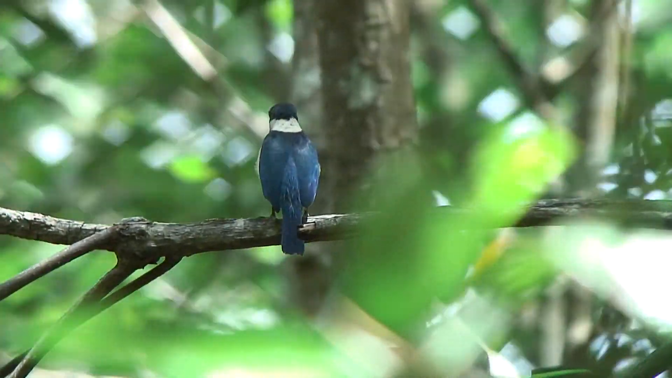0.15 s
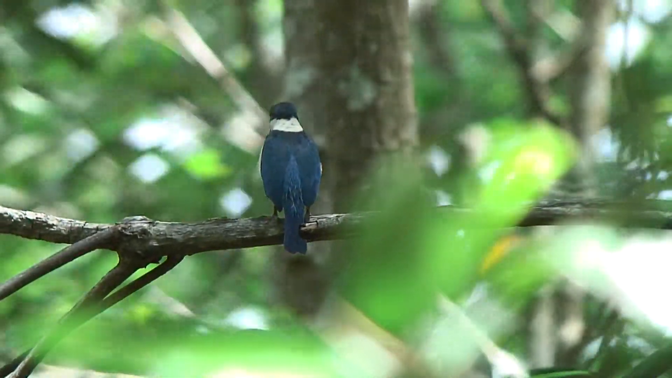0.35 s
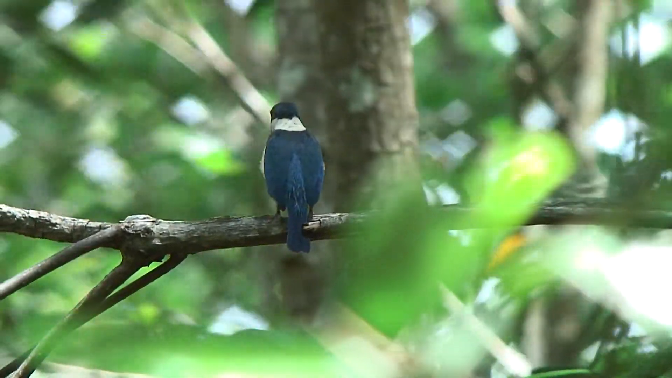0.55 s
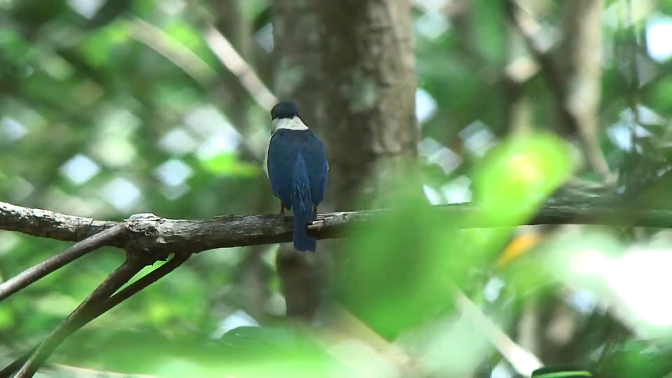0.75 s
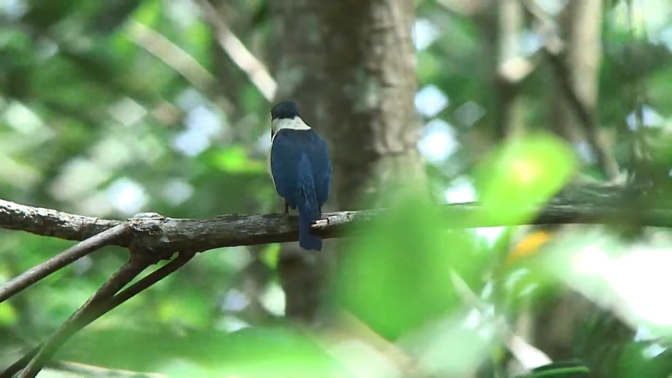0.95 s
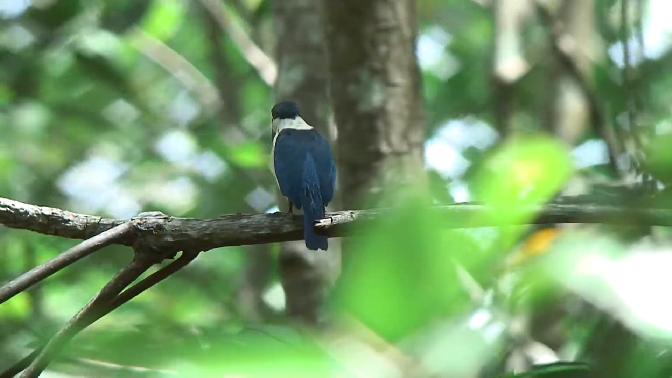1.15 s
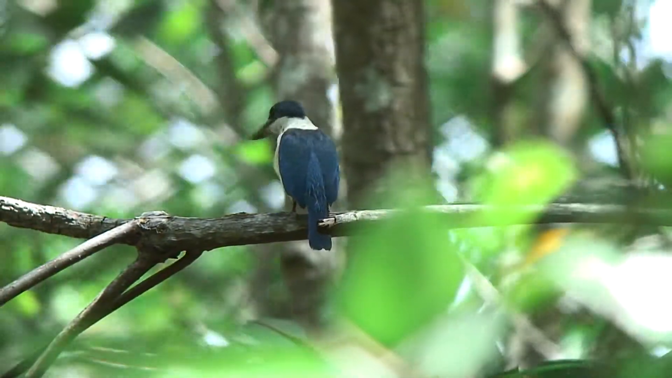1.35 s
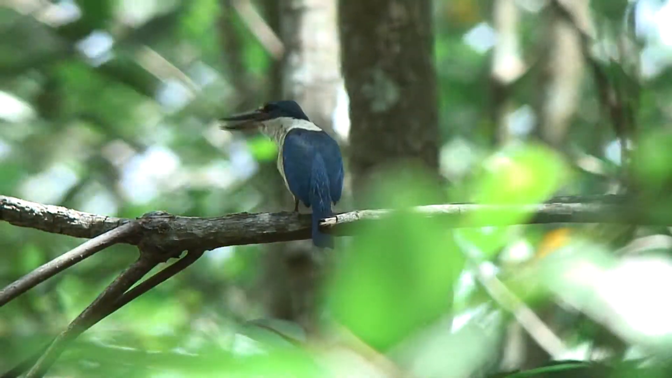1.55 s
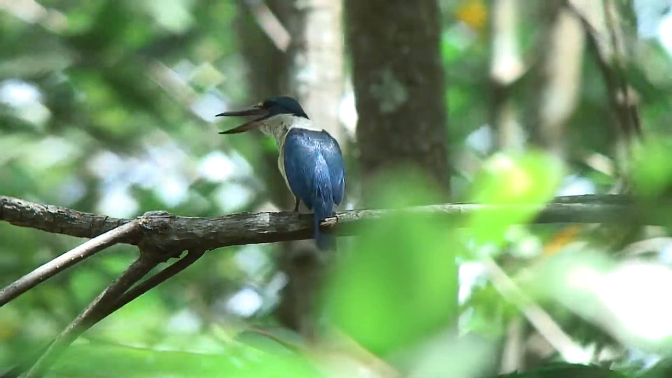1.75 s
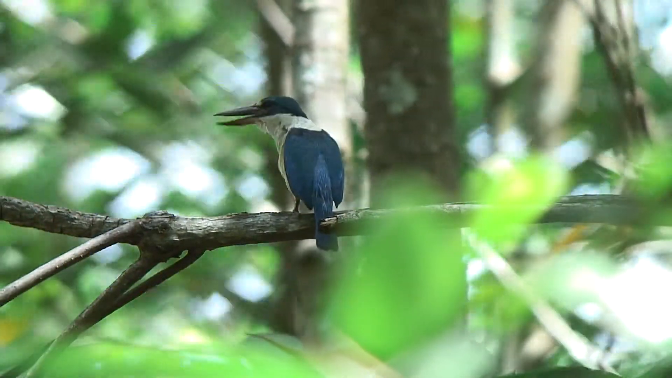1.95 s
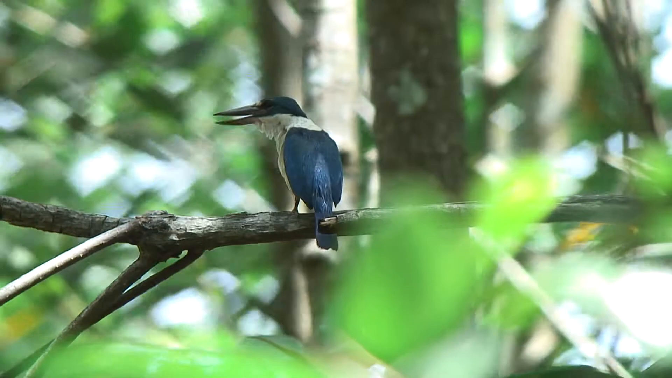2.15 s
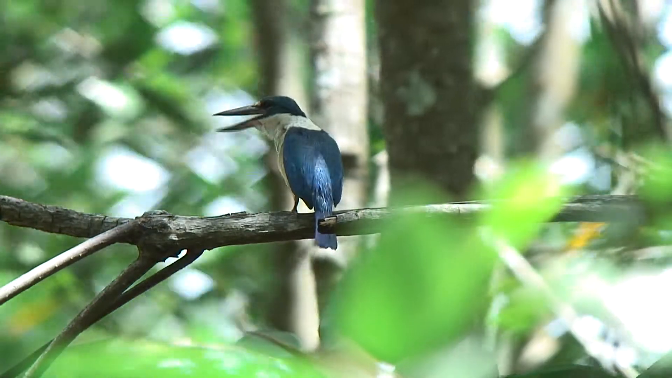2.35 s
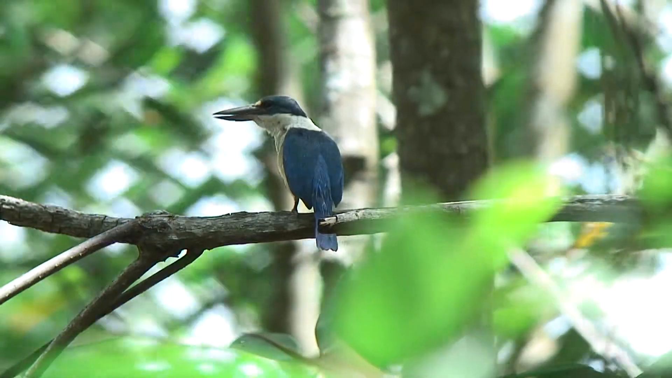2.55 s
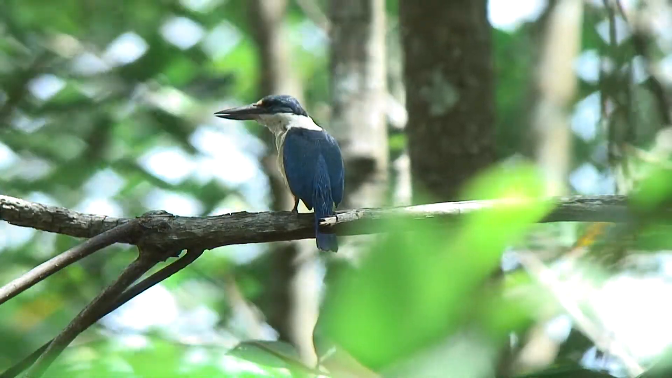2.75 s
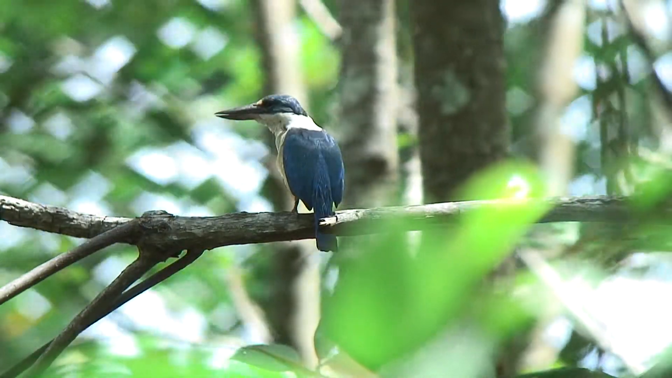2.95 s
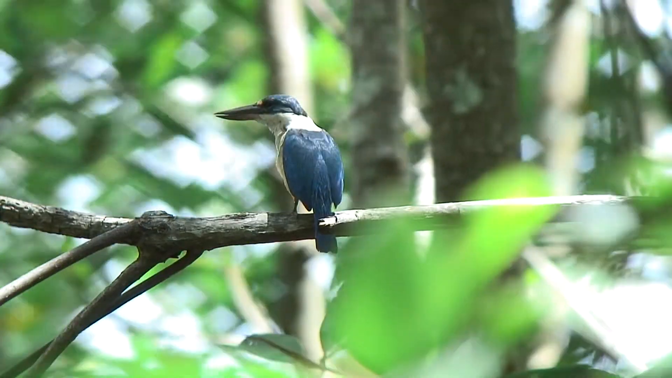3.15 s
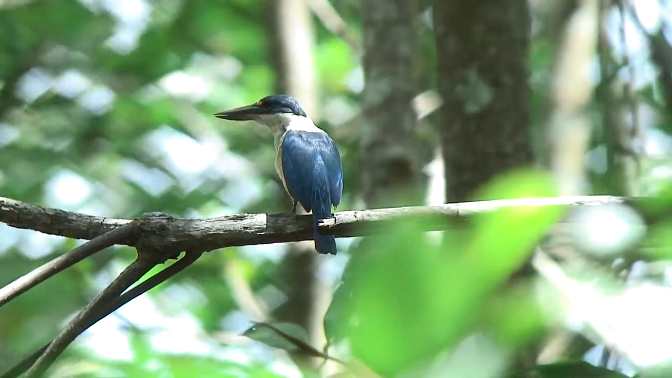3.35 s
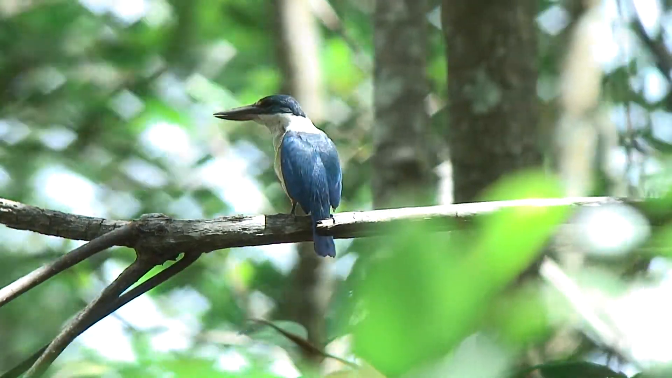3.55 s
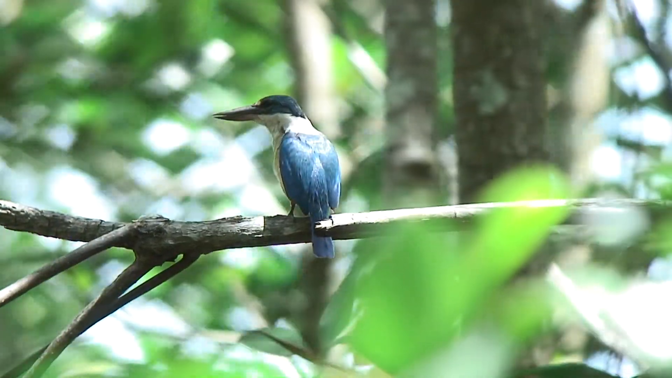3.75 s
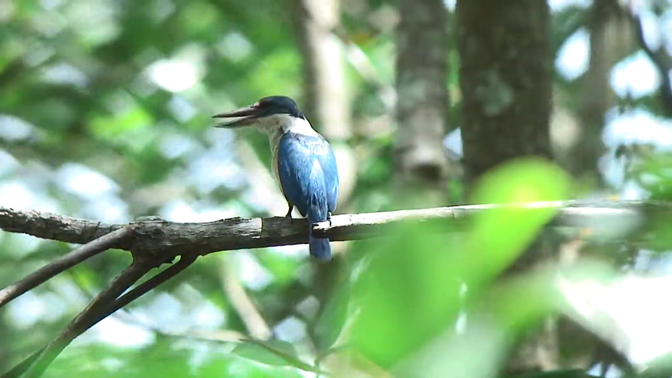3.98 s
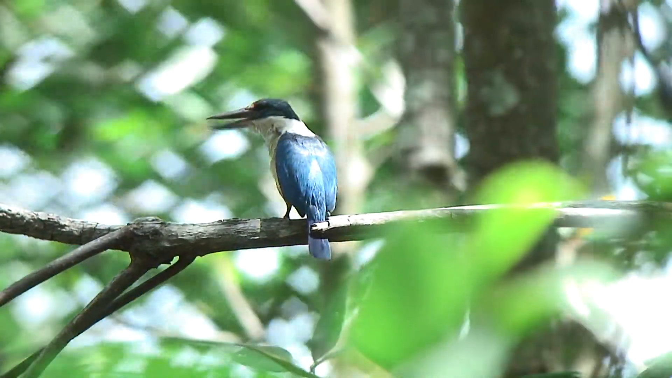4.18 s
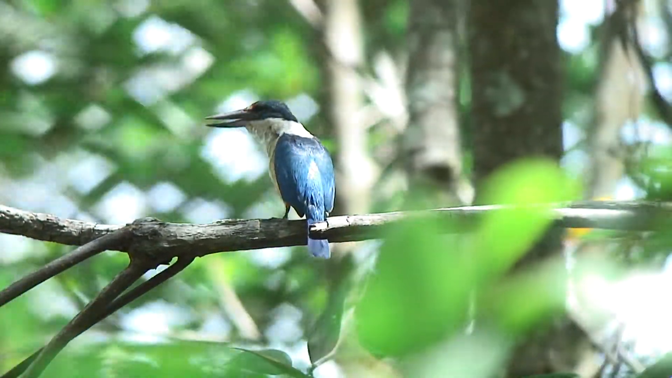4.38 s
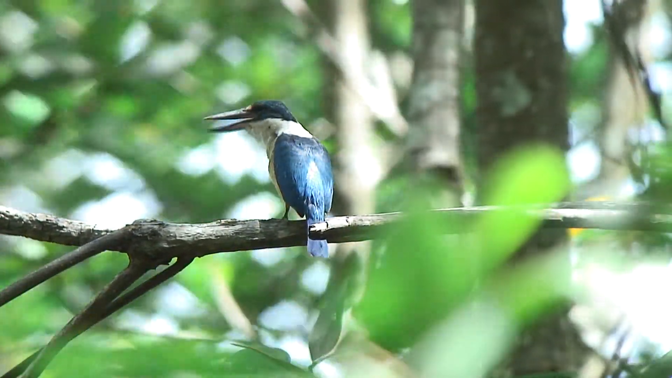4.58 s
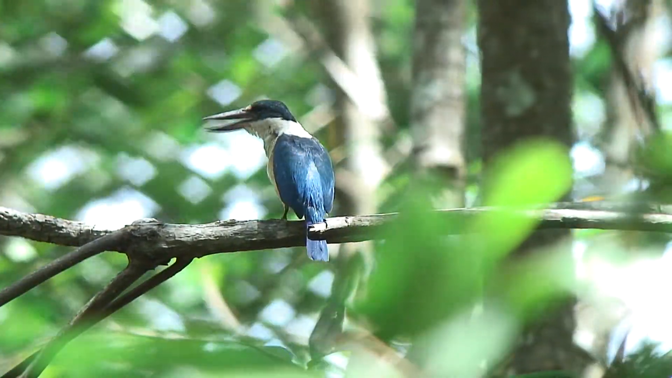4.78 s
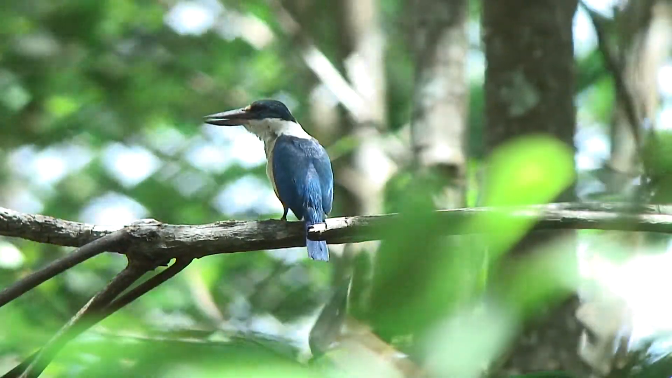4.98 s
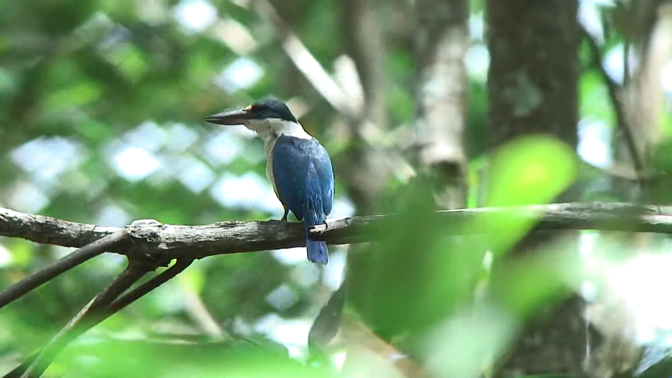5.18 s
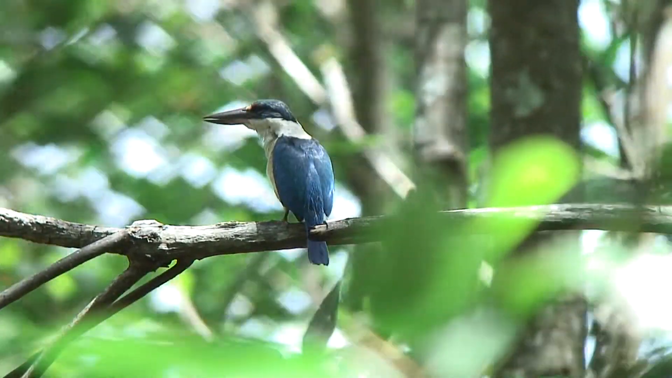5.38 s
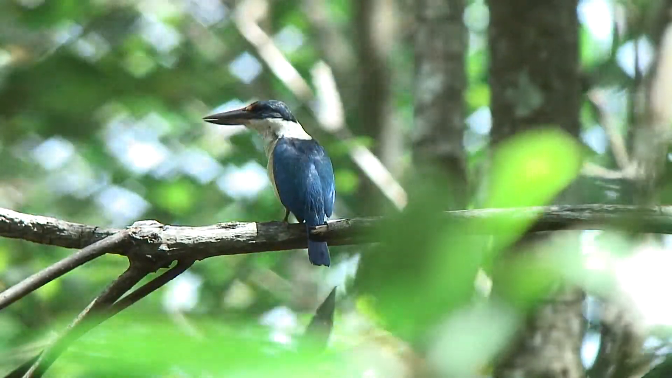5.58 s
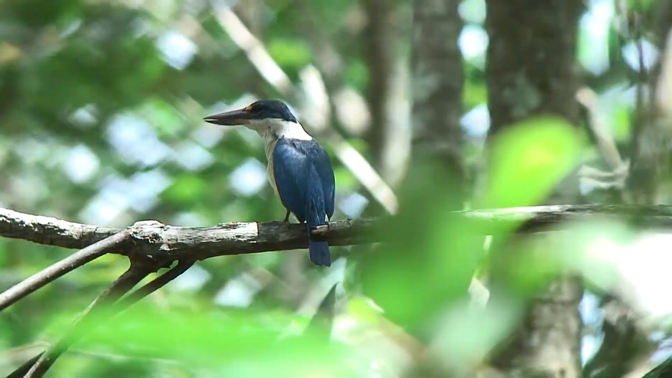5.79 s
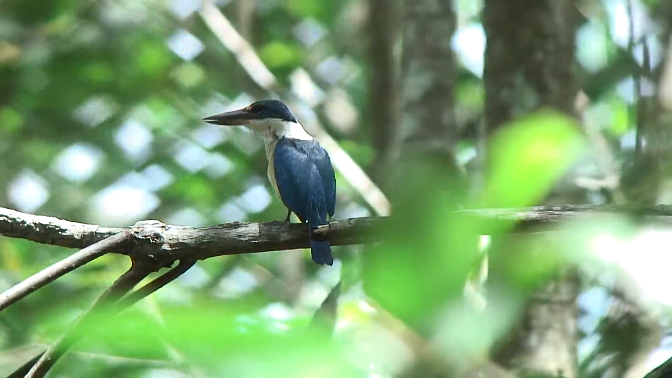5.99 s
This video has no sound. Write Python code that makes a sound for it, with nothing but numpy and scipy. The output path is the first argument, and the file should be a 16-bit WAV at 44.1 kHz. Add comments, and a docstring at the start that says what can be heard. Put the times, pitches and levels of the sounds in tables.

```python
"""Forest hiss and thin insect buzzes run from the start: noise shaped in pitch and level.
At 1.6 s a kingfisher calls a soft opening note and three harsh cries, and at 4.1 s it calls such a phrase again.
Each note is a stack of falling sine tones; cries also split into half and quarter tones and end hoarse.
Trunks and leaves scatter every call into a long tail of decaying noise.
Near the end come one thin high tick and one faint far bird, both made of narrowed noise."""
import sys
import numpy as np
from scipy import signal
from scipy.fft import rfft, irfft
from scipy.io import wavfile

SR = 44100
rng = np.random.default_rng(int(sys.argv[2]) if len(sys.argv) > 2 else 0)


def transcribe(signal):
    """Save signal, clipped to [-1, 1], as a 16-bit WAV file at the path in sys.argv[1]."""
    frames = np.atleast_2d(signal).T
    limited = np.clip(frames, -1, 1)
    pcm = np.round(limited * 32767).astype(np.int16)
    wavfile.write(sys.argv[1], SR, pcm)


N = 265746   # length of the scene in samples
TIME = np.arange(N) / SR   # seconds

CLEAR, HOARSE = 0.034, 0.56   # roughness of a clear and of a hoarse voice, 0-1


def kingfisher():
    """Both phrases as they leave the bill: the voice sings an opening note and three cries each time."""
    # soft opening notes: start_s, length_s, top_pitch_hz, level_db, swells_after_s
    opening_notes = [(1.587, .099, 1633, -26, 0.046), (4.082, .118, 1573, -25.5, 0.038)]
    # harsh cries: start_s, length_s, top_pitch_hz, level_db, splits_after_s, breaks_after_s,
    # share_of_fall_at_break (0-1), likeness_to_closing_cry (0-1)
    cries = [(1.846, 0.11, 1721, -23.5, 0.034, 0.065, .26, 0.3),
             (2.136, 0.1, 1711, -22, 0.025, .057, 0.241, 0.2),
             (2.426, 0.098, 1670, -24, 0.03, 0.057, 0.13, 0.95),
             (4.345, 0.1, 1734, -22.5, 0.021, 0.069, 0.25, 0),
             (4.627, .104, 1720, -22.5, 0.016, .066, 0.231, 0),
             (4.918, 0.092, 1681, -23.5, 0.026, 0.05, 0.13, 0.97)]
    # harmonics of the voice: multiple_of_pitch, opening_note_db, cry_db
    harmonics = [(1, -8, -5.5), (2, -1.5, -1), (3, -7, -9), (4, -10, -13), (5, -35.5, -27.5), (6, -22, -25),
                 (7, -19, -23.5), (8, -17.5, -19), (9, -24.5, -25.5)]
    # tones between the harmonics when the voice splits: quarters_of_pitch, cry_db, closing_cry_db
    side_tones = [(6, -14, -15.5), (7, -19.5, -25.5), (9, -9, -15.5), (10, -9, -6.5), (11, -32, -21),
                  (13, -22.5, -21), (14, -14, -9.5), (15, -27, -27), (18, -25.5, -26), (22, -25.5, -30.5),
                  (26, -31.5, -34), (30, -30, -23.5)]
    multiples, opening_db, cry_db = np.transpose(harmonics)
    quarters, cry_side_db, closing_side_db = np.transpose(side_tones)
    out = np.zeros(N)

    for start, length, top_hz, db, swell_s in opening_notes:
        course = opening_course(length, swell_s)
        sound = note(course, zip(multiples, opening_db), zip(quarters, cry_side_db), top_hz)
        add(out, start, from_db(db) * sound)

    for start, length, top_hz, db, split_s, break_s, step, closing in cries:
        course = cry_course(length, split_s, break_s, step)
        side_db = cry_side_db + np.clip(closing, 0, 1) * (closing_side_db - cry_side_db)
        sound = note(course, zip(multiples, cry_db), zip(quarters, side_db), top_hz)
        add(out, start, from_db(db) * sound)
    return out


def note(course, harmonics, side_tones, top_hz, jitter=0.013, rasp_db=-22.5):
    """One arched note: the tones of the syrinx, a bird's voice box, sweep through the throat's resonance."""
    # throat and open bill: pitch_hz, gain_db
    throat = [(1200, -17.5), (1500, -13.5), (1700, -10.5), (2300, -1.5), (2700, -2.5), (3000, -0.5),
              (3450, 1.5), (3800, -9.5), (4900, -12.5), (5600, -21), (6500, -12), (7600, -22.5),
              (8850, -11.5), (9800, -23), (14000, -24)]
    # rasp of air in the throat: pitch_hz, density_db (dB per Hz)
    rasp = [(1200, -25.5), (2000, -28), (2900, -10.5), (3600, -7), (5000, -9.5), (7300, -9), (9000, -5.5),
            (11000, -20.5), (14000, -19.5), (16000, -31.5)]
    end_hz = 1242   # every note falls towards this pitch
    flutter_db, flutter_hz = 3.5, 161   # a hoarse voice flutters in level

    lift, effort, split, rough, twang_db = course
    size = len(lift)
    pitch = end_hz + lift * (top_hz - end_hz)
    pitch = pitch * (1 + jitter * rough * wander(450, size))
    phase = 2 * np.pi * np.cumsum(pitch) / SR

    def tone(multiple, db):
        """A sine at a multiple of the pitch, as loud as the throat lets it through."""
        gain = from_db(db + at_hz(throat, multiple * pitch)[0])
        return gain * np.sqrt(2) * np.sin(multiple * phase + rng.uniform(0, 2 * np.pi))

    # the second harmonic carries the note; twang changes the level of its neighbours and the fourth
    voice = sum(tone(round(k), db + twang_db * (round(k) in (1, 3, 4))) for k, db in harmonics)
    # the period doubles, then doubles again: tones appear between the harmonics
    voice += split * sum(tone(round(q) / 4, db) for q, db in side_tones)
    # air rasps once in every cycle
    voice += from_db(rasp_db) * rough * coloured(rasp, size) * (1 + np.cos(phase))

    flutter = from_db(flutter_db * rough * wander(flutter_hz, size))
    soft_ends = signal.windows.tukey(size, .04)
    voice *= effort * flutter * soft_ends
    # so small a bill radiates no lows
    return signal.sosfilt(signal.butter(4, 900, "high", fs=SR, output="sos"), voice)


def opening_course(length, swell_s):
    """Thin and soft at first, then the note swells; it frays most towards its end."""
    scoop_s, attack_s, swell_time_s, release_s = 0.01, 0.004, .0022, 0.0033
    soft_db, fade_db = -9.5, -4.5   # level before the swell; change over the whole fall
    base_twang_db = -4.5   # twang makes up for the softness before the swell
    split_db, fray_db = -32.5, 24   # side tones stay faint and rise only as the note falls

    t, scoop, fall = arch(length, scoop_s)
    softness_db = soft_db * (1 - switch(t - swell_s, swell_time_s))
    gate = (1 - np.exp(-t / attack_s)) * (1 - np.exp((t - length) / release_s))
    effort = gate * from_db(softness_db + fade_db * fall)
    split = from_db(split_db + fray_db * fall)
    rough = CLEAR + (HOARSE - CLEAR) * fall ** 2
    return 1 - scoop - fall, effort, split, rough, base_twang_db - softness_db


def cry_course(length, split_s, break_s, step):
    """A clear start and a split near the crest; then the voice breaks, steps down and ends hoarse."""
    scoop_s, attack_s = 0.00497, 0.0083
    split_time_s, break_time_s, hoarse_time_s = 0.00083, 0.0031, 0.0046   # how gradually each change comes
    split_db, flare_db, split_fade_db = 0.5, 5, -23   # side tones: at crest, extra at break, over the fall
    fade_db = -6   # change of level over the whole fall
    crest_twang_db, twang_fade_db = 1.27, -7.5   # twang before the break, and its change at the break

    t, scoop, fall = arch(length, scoop_s)
    broken = switch(t - break_s, break_time_s)
    flare = np.exp(-((t - break_s) / (2 * break_time_s)) ** 2 / 2)
    fall = step * broken + (1 - step) * fall
    effort = (1 - np.exp(-t / attack_s)) * from_db(fade_db * np.sqrt(np.abs(fall)))
    side_tone_db = split_db + flare_db * flare + split_fade_db * fall ** 2
    split = switch(t - split_s, split_time_s) * from_db(side_tone_db)
    rough = CLEAR + (HOARSE - CLEAR) * switch(t - break_s, hoarse_time_s)
    return 1 - scoop - fall, effort, split, rough, crest_twang_db + twang_fade_db * broken


def arch(length, scoop_s):
    """A note scoops up, crests, sags and finally drops: time, depth of the scoop, share of the fall done."""
    crest = .29   # share of the note after which its pitch falls
    scoop_depth = .66   # share of the arch by which the note starts low
    sag, sag_bend, drop_bend = 0.6, 1.4, 5.84   # share of the fall that sags slowly; bends (1 = straight)
    t = np.arange(int(length * SR)) / SR
    late = np.clip((t / length - crest) / (1 - crest), 0, 1)
    fall = sag * late ** sag_bend + (1 - sag) * late ** drop_bend
    return t, scoop_depth * np.exp(-t / scoop_s), fall


def forest(call, near_t60=0.52, near_db=-3.0, far_db=-3, build_s=0.0087, bill_hz=7000):
    """The straight path and a diffuse tail: near leaves and far trees scatter the call as decaying noise."""
    # scattering by the forest: pitch_hz, level_db, far_tail_t60_s (time to fade by 60 dB)
    scattering = [(1200, -3, 0.46), (1650, -10.5, 0.76), (2577, 5, 1.28), (3260, -0.5, 1.14),
                  (4800, -1, 1.24), (6700, 0, 1.3), (8900, 4, 0.85), (15000, 2, 0.35)]
    t = np.arange(int(1.3 * SR)) / SR
    edges = np.geomspace(1000, 16000, 13)   # Hz, limits of twelve bands
    tail = np.zeros(len(t))
    for low, high in zip(edges, edges[1:]):
        db, far_t60 = at_hz(scattering, np.sqrt(low * high))
        band = signal.butter(2, [low, high], "band", fs=SR, output="sos")
        for decay_s, part_db in ((near_t60, near_db), (far_t60, far_db)):
            shape = from_db(-60 * t / decay_s) * (1 - np.exp(-(t / build_s) ** 2))
            echoes = signal.sosfilt(band, rng.standard_normal(len(t)))
            tail += from_db(db + part_db) * echoes * shape / np.linalg.norm(shape)
    # the bill points aside, so the highest tones arrive mostly by way of the trees
    straight = signal.sosfilt(signal.butter(2, min(bill_hz, .45 * SR), fs=SR, output="sos"), call)
    return straight + signal.fftconvolve(call, tail)[:N]


def insects():
    """Two narrow buzzes, far off, and a third insect that whirrs in bouts around a purer note."""
    # insects that buzz on and on: start_s, end_s, pitch_hz, width_hz, level_db
    long_buzzes = [(-.3, 2.1, 6310, 127, -73), (.35, 3.7, 7490, 172, -75)]
    # an insect that sings in bouts: start_s, end_s, level_db
    bouts = [(1.8, 3.035, -76.5), (3.15, 3.822, -70.5), (3.999, 4.823, -70), (4.927, 5.668, -69),
             (5.97, 6.3, -68.5)]
    buzz_fade_s, bout_fade_s = .1, 0.026
    waver_db, waver_hz = 3.6, 2.9   # the song wavers in level

    def sounding(start, end, db, fade_s):
        """Level of a sound that fades in and out."""
        return from_db(db) * switch(TIME - start, fade_s) * switch(end - TIME, fade_s)

    buzzes = sum(sounding(start, end, db, buzz_fade_s) * narrow_noise(hz, width_hz)
                 for start, end, hz, width_hz, db in long_buzzes)
    pure_note = narrow_noise(hz=7300, width_hz=73)
    whirr = from_db(-2.5) * narrow_noise(hz=7370, width_hz=480)
    song = (pure_note + whirr) * from_db(waver_db * wander(waver_hz, N))
    return buzzes + song * sum(sounding(start, end, db, bout_fade_s) for start, end, db in bouts)


def background(tick_s=5.822, tick_db=-65.5, tick_t60=0.21):
    """Hiss of the forest as shaped noise, a thin tick that dies away, and a far bird as narrow noise."""
    # forest hiss, its colour: pitch_hz, density_db (dB per Hz)
    hiss_colour = [(59, -84.5), (100, -51.5), (258, -43.5), (808, -15.5), (1550, -2.5), (2800, -0.5),
                   (4750, -6), (5630, -10.5), (6250, -9.5), (6800, -14.5), (7400, -11), (8230, -19),
                   (13600, -24), (14500, -26.5), (15500, -53)]
    # forest hiss, its loudness: time_s, level_db
    hiss_level = [(0, -58), (1.2, -57.3), (2.5, -57.5), (3.6, -59), (4.1, -58), (6.03, -59)]
    # far bird, its loudness: time_s, level_db
    far_bird_level = [(5.88, -88), (5.95, -59), (6.03, -59)]
    hiss = from_db(along(hiss_level, TIME)[0]) * coloured(hiss_colour, N)
    tick_gain = (TIME >= tick_s) * from_db(tick_db - 60 * np.abs(TIME - tick_s) / tick_t60)
    tick = tick_gain * narrow_noise(hz=12400, width_hz=7200)
    far_bird = from_db(along(far_bird_level, TIME)[0]) * narrow_noise(hz=2827, width_hz=94)
    return hiss + far_bird + tick


def from_db(db):
    """Decibels to gain."""
    return 10 ** (np.asarray(db) / 20)


def rms_one(x):
    """Scale to unit power."""
    return x / np.sqrt(np.mean(x ** 2) + 1e-20)


def along(rows, at):
    """Every column of a table after the first, joined by straight lines."""
    first, *columns = np.transpose(rows)
    return [np.interp(at, first, c) for c in columns]


def at_hz(rows, hz):
    """Every column of a spectrum after the first, on a log-frequency axis."""
    first, *columns = np.transpose(rows)
    return [np.interp(np.log(np.maximum(hz, 1)), np.log(first), c) for c in columns]


def coloured(spectrum, size):
    """Noise with a given spectrum, scaled to unit power."""
    hz = np.arange(size // 2 + 1) * SR / size
    white = rfft(rng.standard_normal(size))
    return rms_one(irfft(white * from_db(at_hz(spectrum, hz)[0]), size))


def wander(rate_hz, size):
    """Smooth chance of unit power: noise that keeps only its changes slower than the rate."""
    low_pass = signal.butter(2, rate_hz, fs=SR, output="sos")
    slow = signal.sosfilt(low_pass, rng.standard_normal(size + SR // 4))
    return rms_one(slow[SR // 4:])   # the filter has settled by then


def narrow_noise(hz, width_hz):
    """Noise in one resonance, scaled to unit power."""
    band = signal.butter(2, [hz - width_hz / 2, hz + width_hz / 2], "band", fs=SR, output="sos")
    return rms_one(signal.sosfilt(band, rng.standard_normal(N)))


def switch(t, time_s):
    """A smooth step from 0 to 1 around t = 0."""
    return .5 + .5 * np.tanh(t / (2 * time_s))


def add(out, start, sound):
    """Mix a sound in at a time in seconds."""
    at = int(start * SR)
    out[at:at + len(sound)] += sound


def scene():
    """The bird in its forest, one channel."""
    return (forest(kingfisher()) + insects() + background())[None, :]


def record(dry, low_cut_hz=300, cutoff_hz=15650):
    """The microphone drops the bass; the top is cut steeply."""
    thin = signal.sosfilt(signal.butter(2, low_cut_hz, "high", fs=SR, output="sos"), dry)
    return signal.sosfilt(signal.ellip(10, .1, 80, cutoff_hz, fs=SR, output="sos"), thin)


dry = scene()
out = record(dry)
transcribe(out)
```